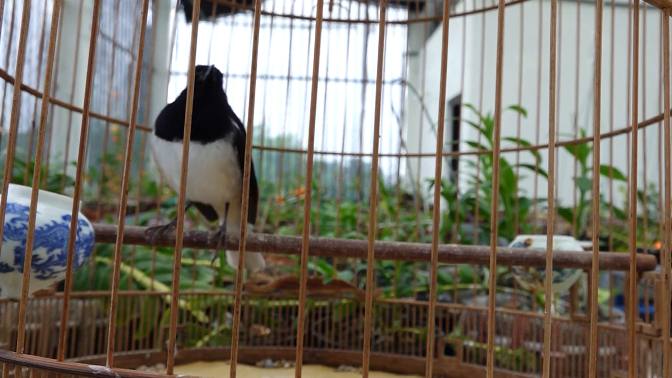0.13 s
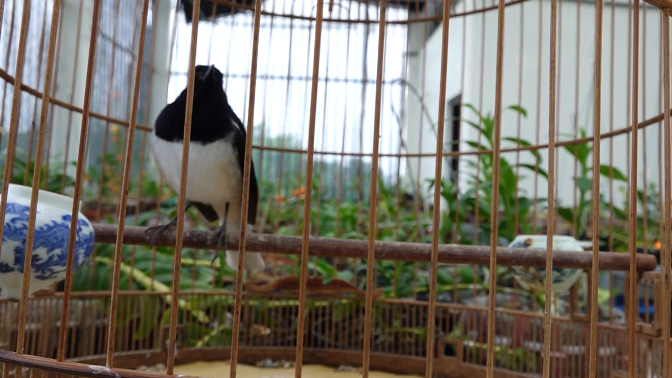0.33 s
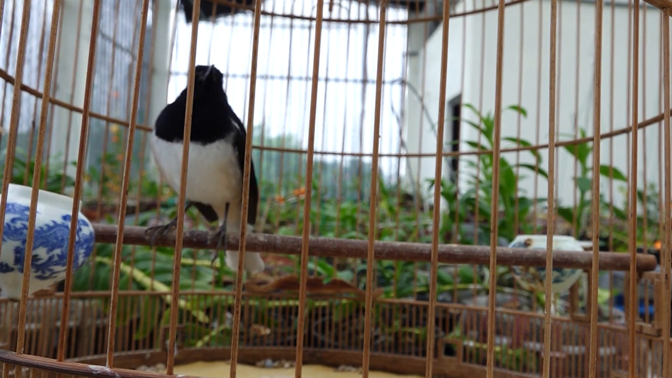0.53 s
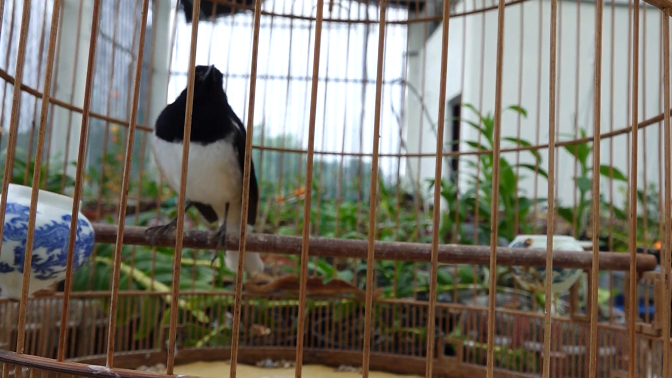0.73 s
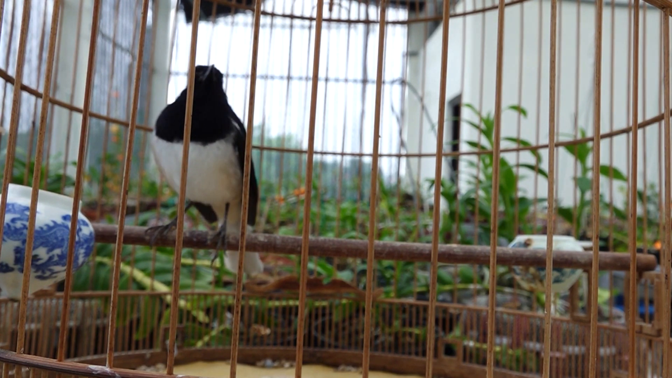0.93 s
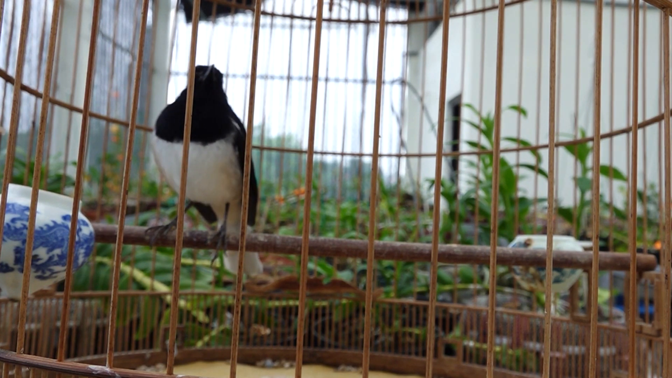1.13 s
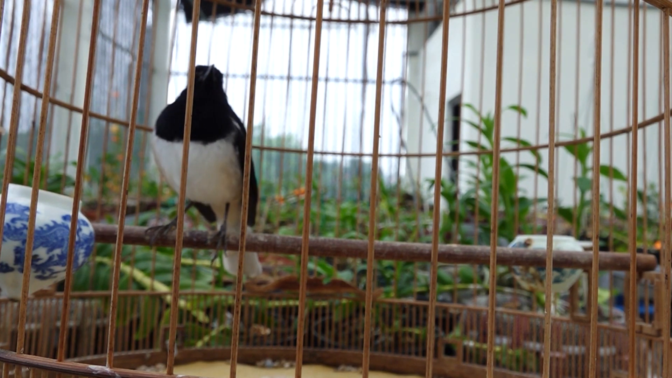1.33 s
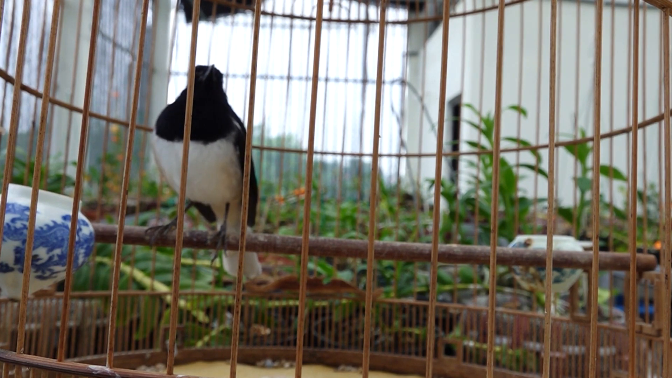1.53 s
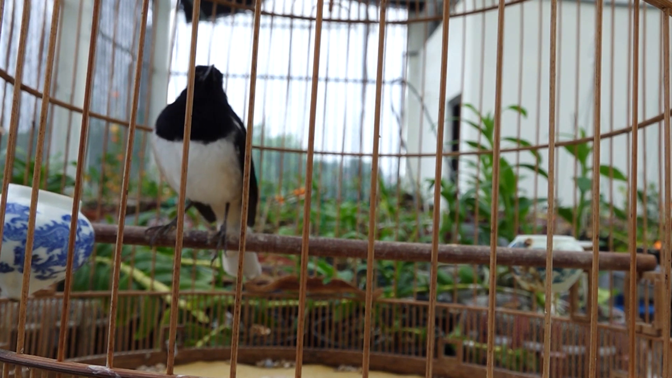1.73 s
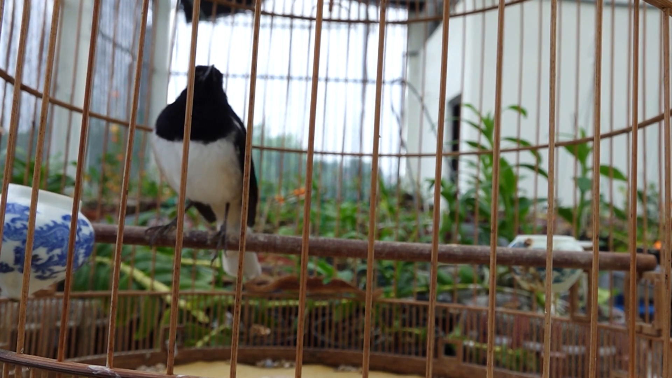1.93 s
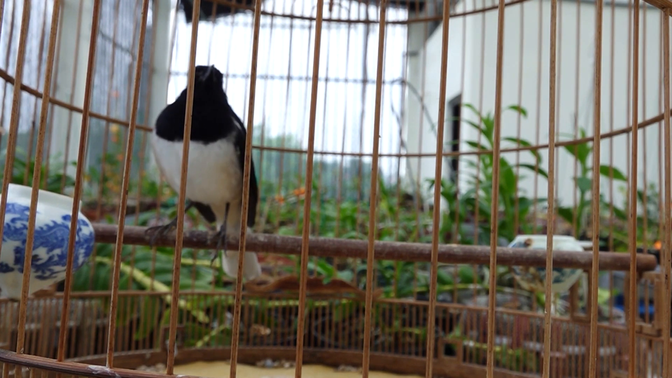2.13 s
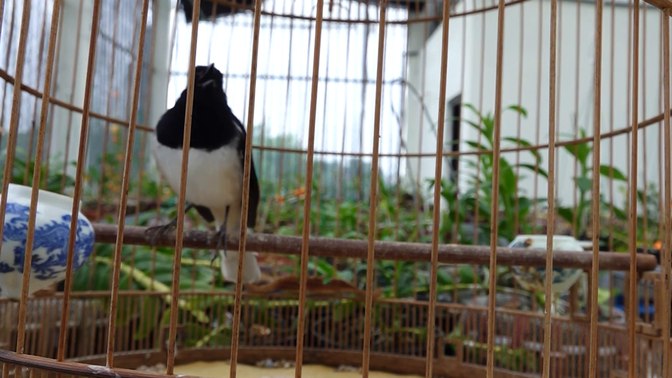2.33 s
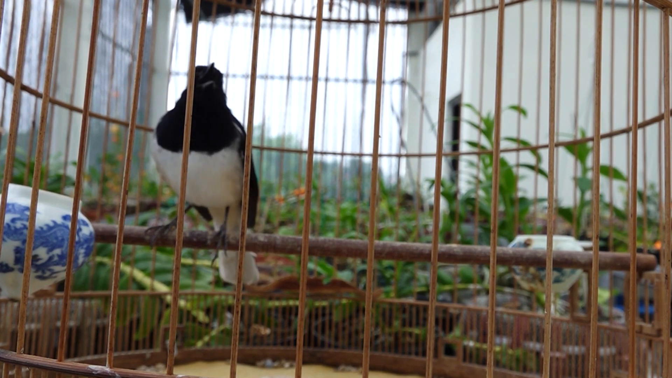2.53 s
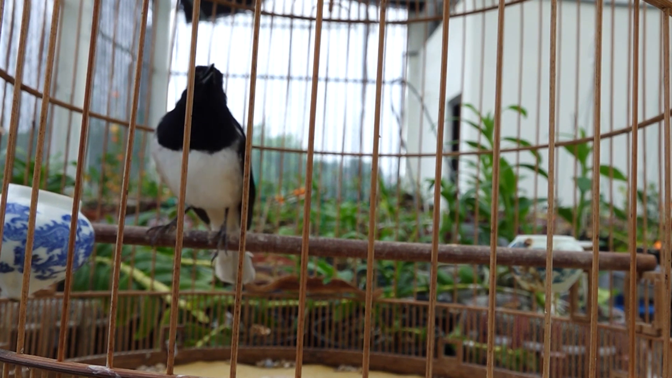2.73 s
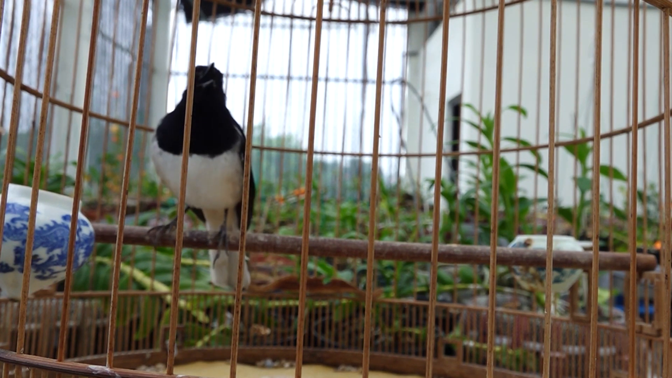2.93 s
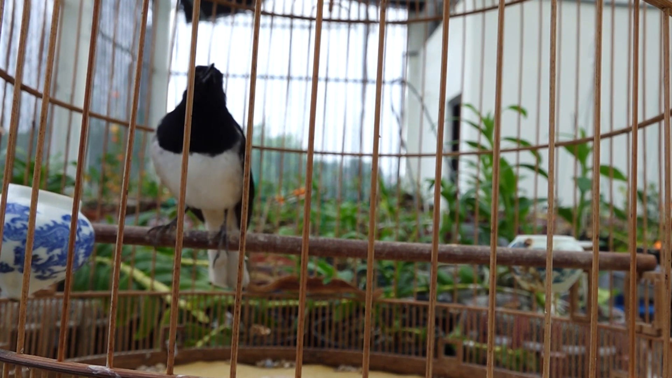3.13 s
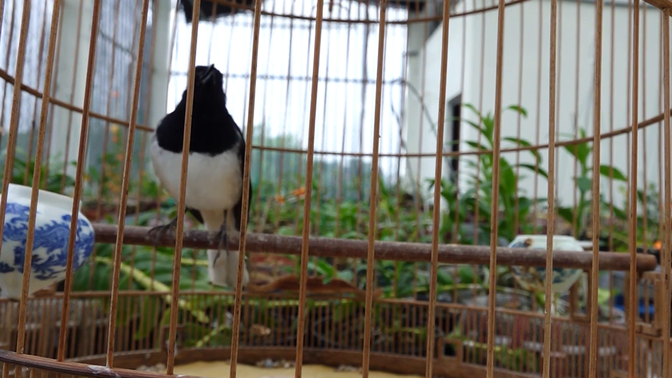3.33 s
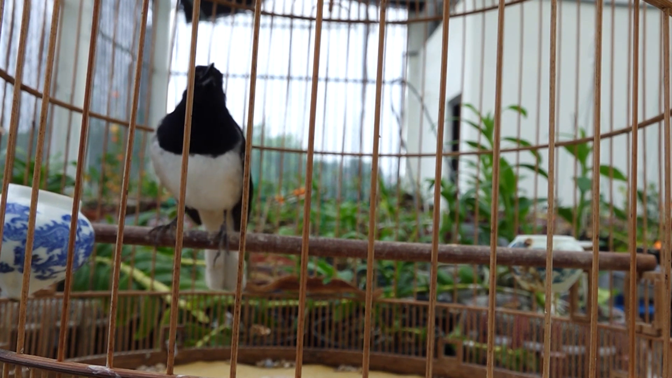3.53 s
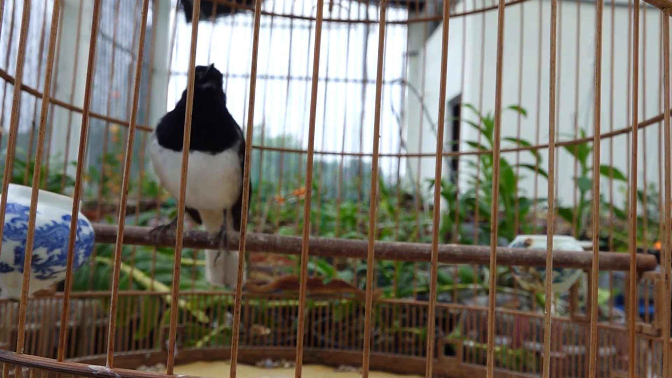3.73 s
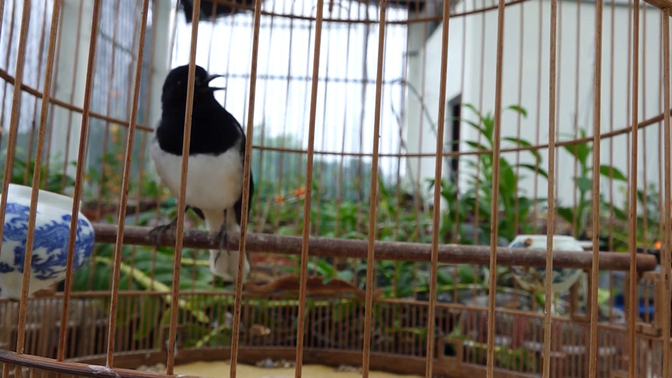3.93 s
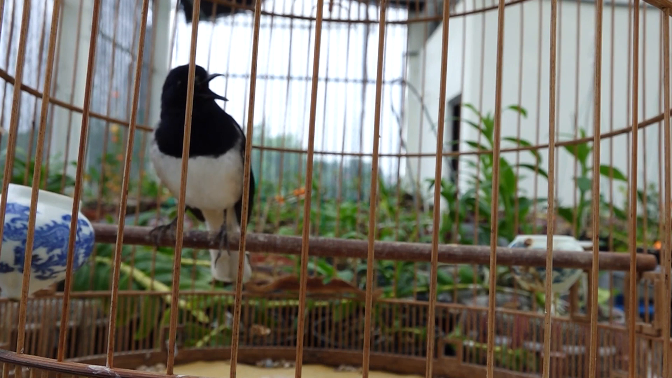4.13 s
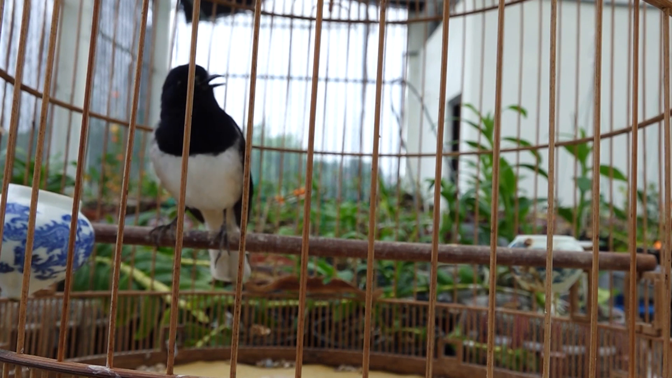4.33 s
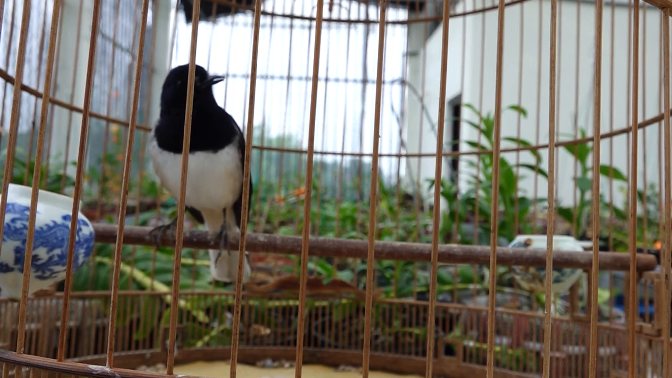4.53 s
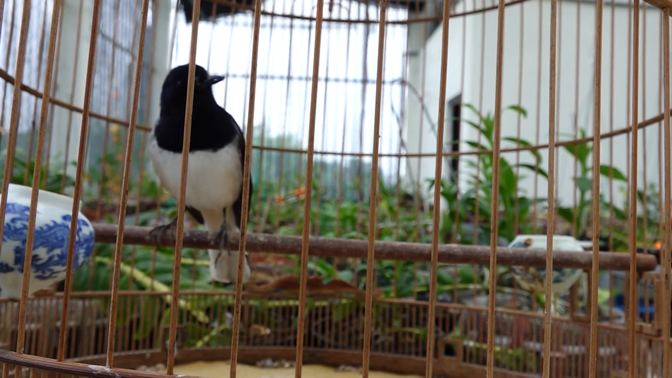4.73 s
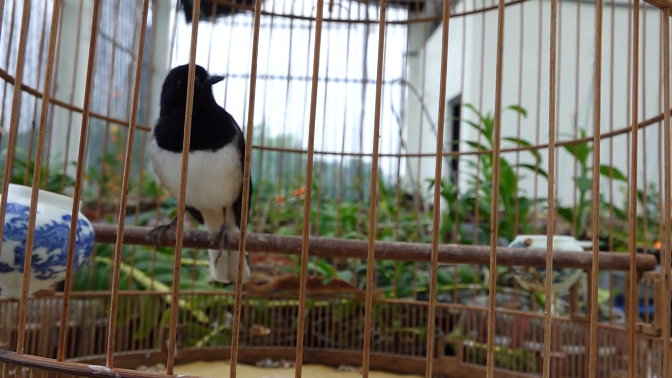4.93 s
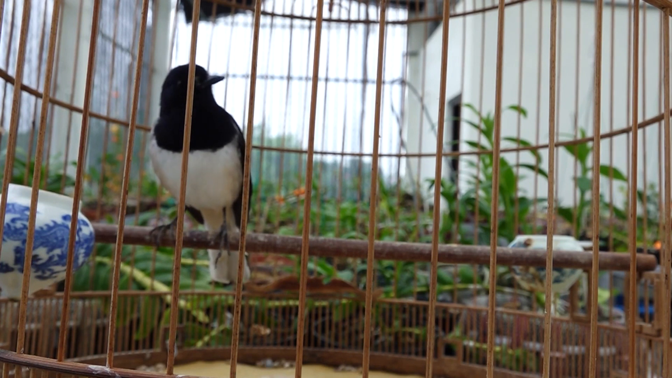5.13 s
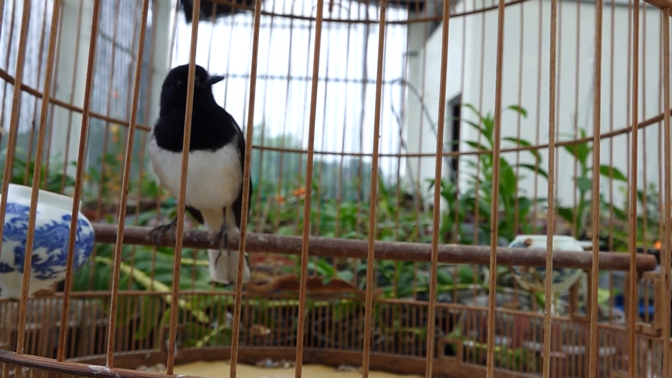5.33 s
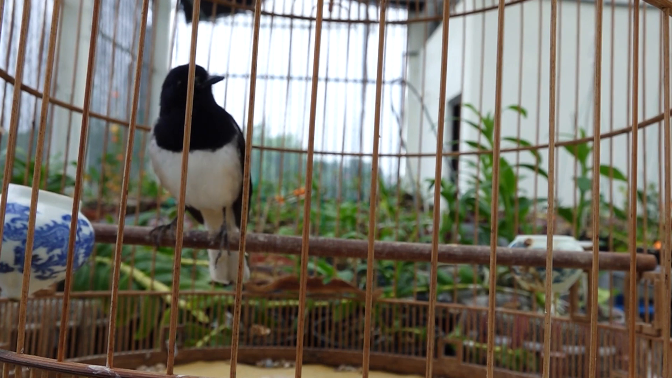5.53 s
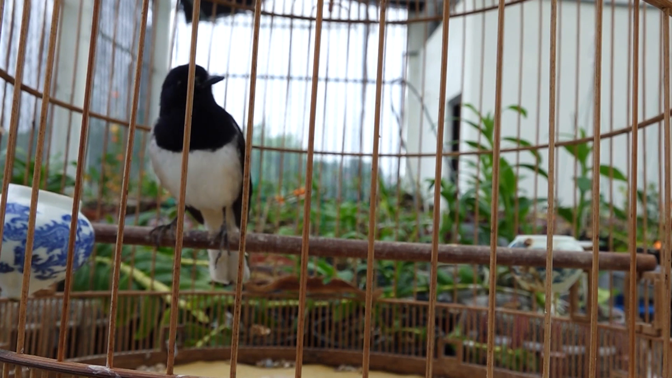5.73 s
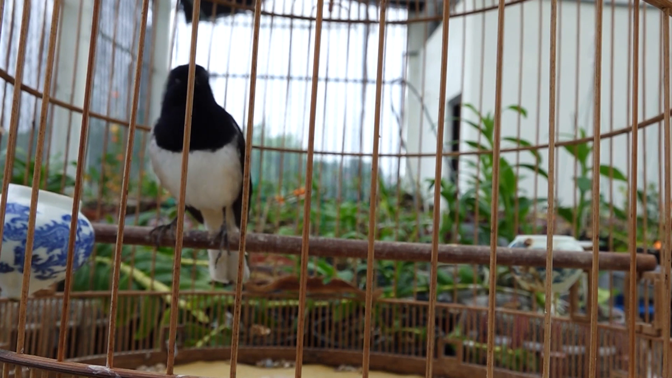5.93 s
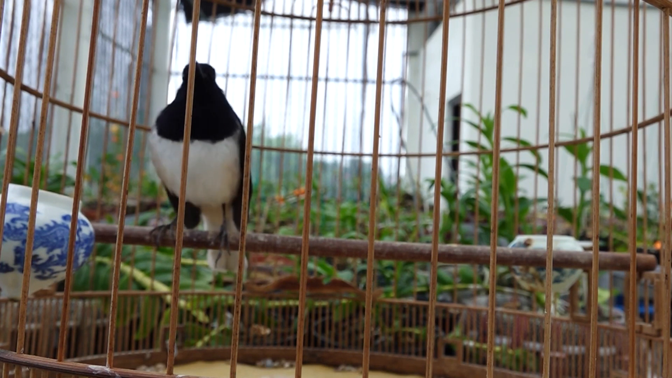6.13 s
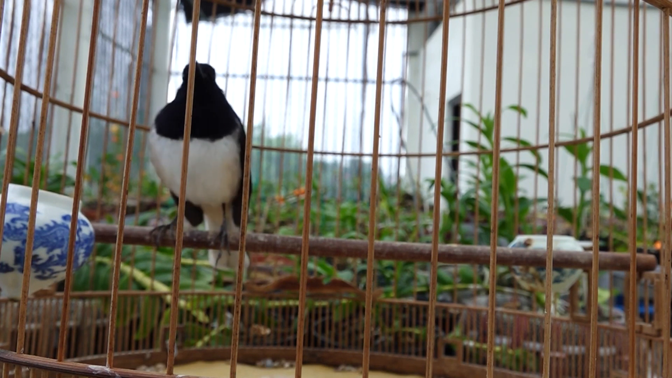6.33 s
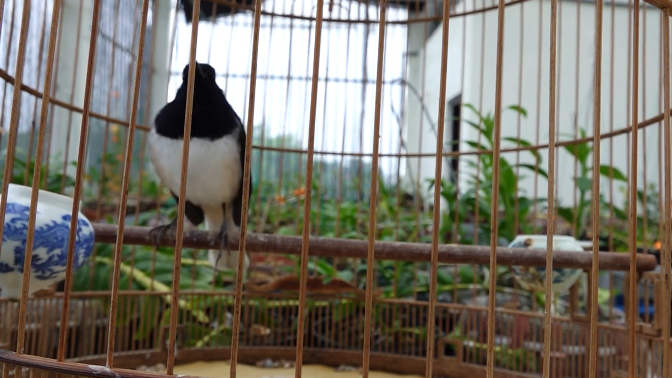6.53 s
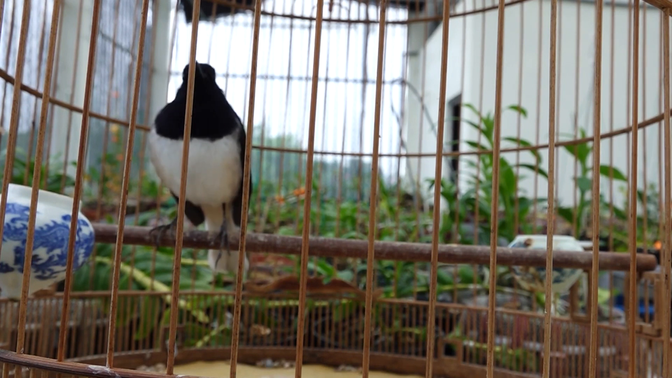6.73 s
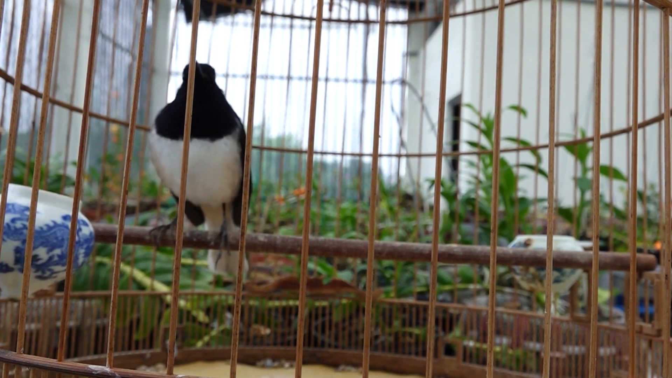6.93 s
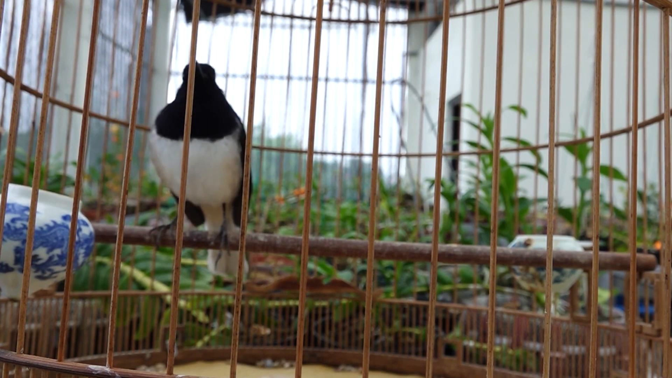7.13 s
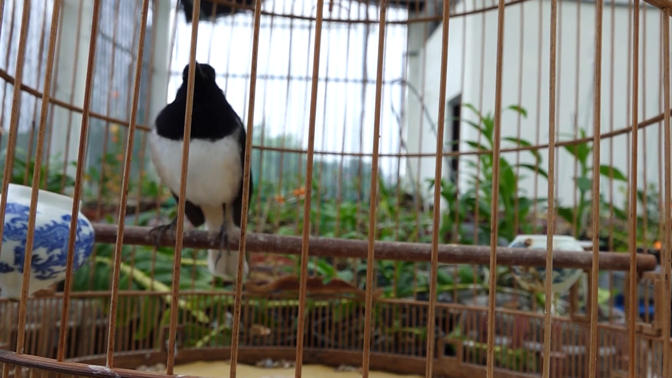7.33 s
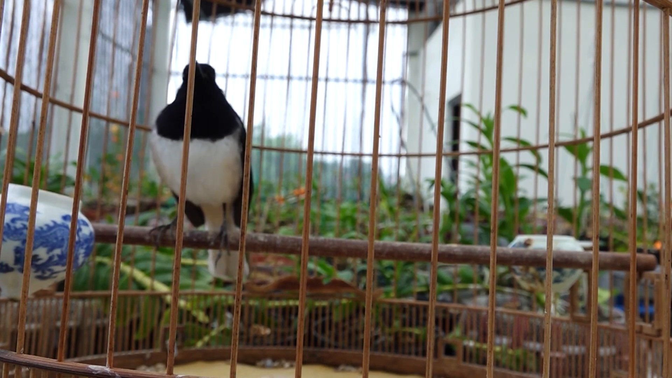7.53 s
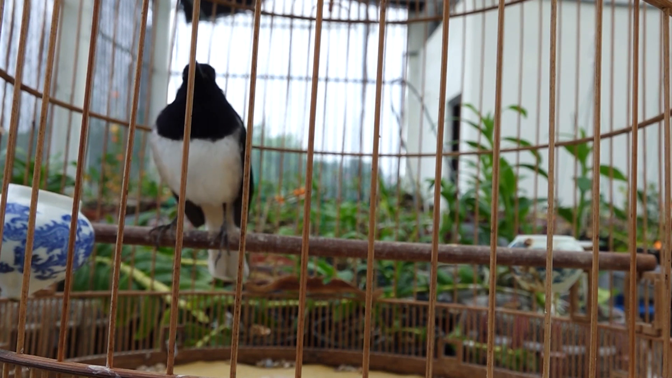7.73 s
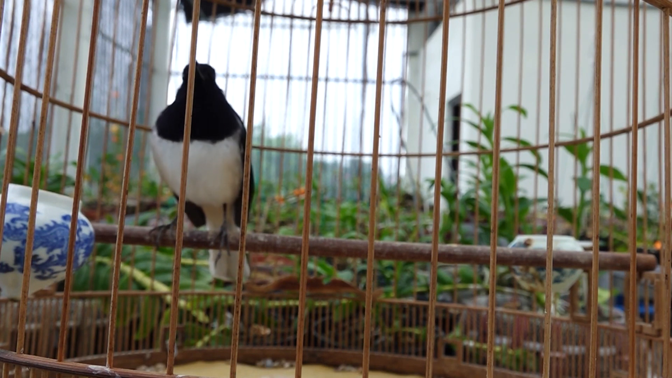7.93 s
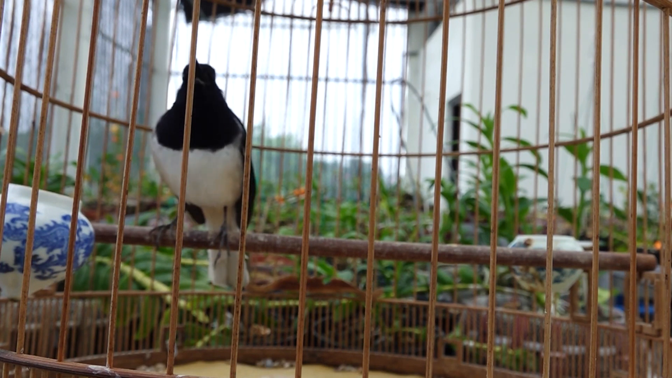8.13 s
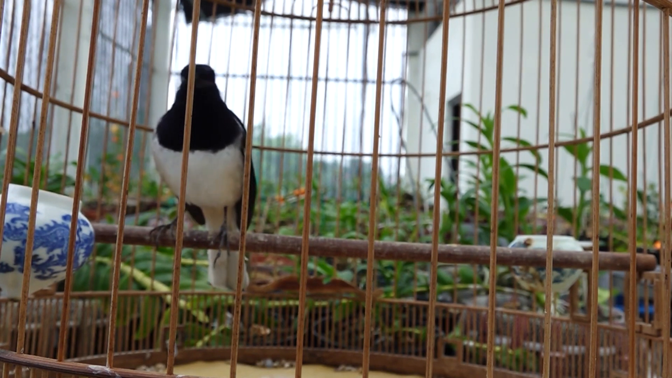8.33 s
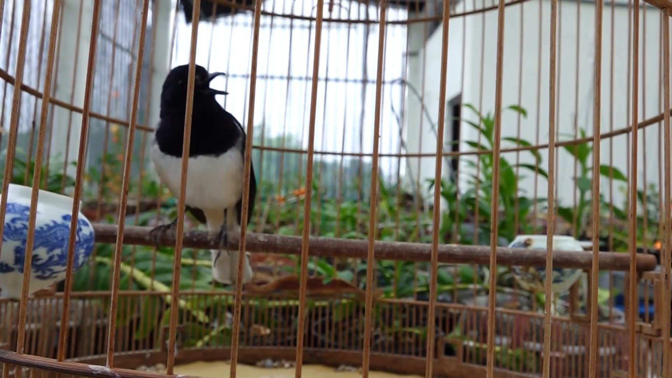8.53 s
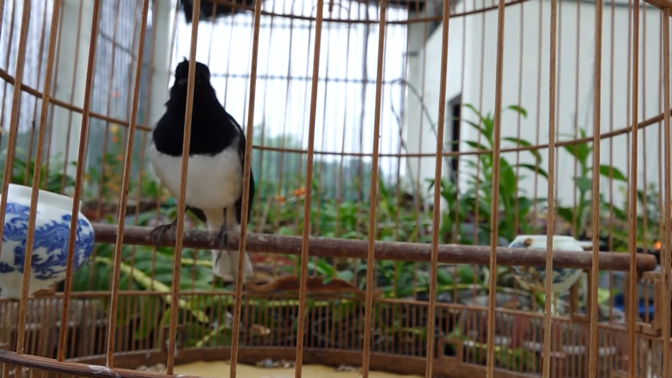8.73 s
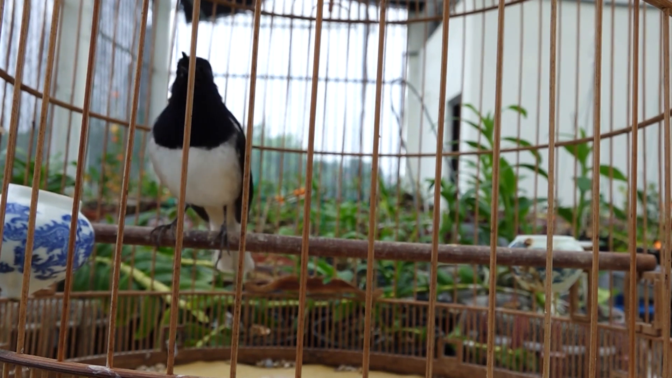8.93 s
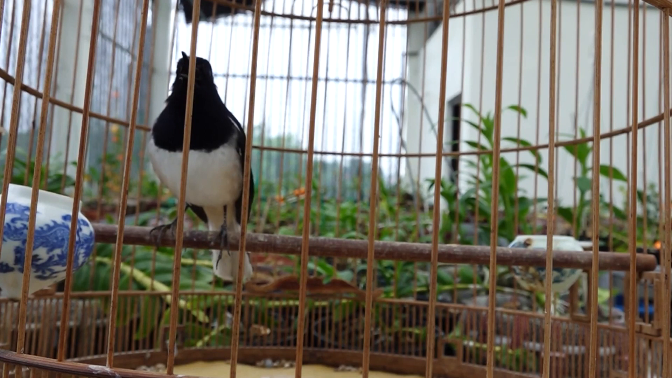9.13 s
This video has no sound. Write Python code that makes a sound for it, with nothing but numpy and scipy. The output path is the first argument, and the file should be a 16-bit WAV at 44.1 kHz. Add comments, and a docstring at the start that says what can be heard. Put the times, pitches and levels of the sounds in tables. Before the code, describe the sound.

A caged magpie-robin sings two loud, ringing phrases of piercing whistles and raspy chatter on a hard-walled veranda, with distant birds over soft outdoor wash.

```python
"""Other birds call at a distance over a soft outdoor wash, most of their sound arriving by reflection.
From 2.4 s a caged magpie-robin, close by on a hard-walled veranda, sings a phrase and the wash sinks.
The two sides of its syrinx whistle alone or together, and together they make sum tones; the walls ring.
Fainter distant calls follow as the wash rises a little; from 8.1 s comes a second phrase, to the end."""
import sys
import numpy as np
from scipy import signal
from scipy.fft import rfft, irfft
from scipy.io import wavfile
from scipy.ndimage import uniform_filter1d, minimum_filter1d

SR = 44100
rng = np.random.default_rng(int(sys.argv[2]) if len(sys.argv) > 2 else 0)


def unload_audio(sound):
    """Save the sound as a 16-bit wav file, at the path given as the first command line argument."""
    columns = np.transpose(np.atleast_2d(sound))
    # keep every value between -1 and 1, then stretch to whole-number steps
    steps = np.round(np.clip(columns, -1, 1) * 32767)
    wavfile.write(sys.argv[1], SR, steps.astype(np.int16))


N = 404838
TIME = np.arange(N) / SR

# All table levels are relative.
# Whistles of the upper voice, one glide each: start t/s, length t/s, from f/Hz, to f/Hz,
# steepest after t/s, glide t/s, level/dB, swell level/dB, attack t/s, release t/s,
# overtone level/dB, harshness (0-1)
UPPER_WHISTLES = [ (2.378, 0.18, 4060, 4702, 0.016, 0.068, -13, -3.5, 0.039, 0.0045, -3, .02),
                  (3.326, 0.064, 5090, 3350, 0.024, 0.031, -25, 10.5, 0.026, 0.0044, -1.5, 0.28),
                  (3.645, 0.026, 3700, 3320, 0.01, 0.022, -17.5, -4.5, .004, 0.0044, -4.5, 0.44),
                  (3.842, 0.13, 5985, 5425, 0.043, .05, -10, -2.5, .05, 0.038, 5.5, 0.05),
                  (4.048, 0.28, 3690, 4642, .001, 0.038, -13.5, -3, 0.038, 0.0024, -14, 0.04),
                  (4.388, 0.028, 5700, 5660, .009, 0.0088, -27, -1, 0.0057, .006, 2.5, 0.23),
                  (8.067, .184, 4235, 4745, 0.058, 0.041, -12.5, -11, 0.057, 0.0078, -3, 0.01),
                  (8.764, 0.23, 4222, 5497, .166, 0.057, -11.5, 2.5, 0.018, 0.02, -3, 0.06)]
# Whistles of the lower voice: start t/s, length t/s, from f/Hz, to f/Hz,
# steepest after t/s, glide t/s, level/dB, swell level/dB, attack t/s, release t/s,
# overtone level/dB, harshness (0-1)
LOWER_WHISTLES = [ (2.5, 0.22, 3903, 3782, .108, 0.047, -13.5, 4, 0.017, 0.012, -3, .025),
                  (2.939, .153, 3310, 3869, .001, .036, -13, -2.5, 0.0087, 0.0055, -2, 0.22),
                  (3.232, 0.051, 2553, 2400, 0.036, 0.011, -22, 2, 0.0095, 0.0055, -17, 0.49),
                  (3.329, 0.062, 4640, 2620, 0.015, 0.029, -18.5, -13, .023, 0.034, -2, .08),
                  (3.549, 0.051, 2725, 2626, 0.02, 0.0056, -22.5, -8, 0.0066, 0.0087, -6.5, .35),
                  (3.621, 0.064, 5172, 2861, 0.016, 0.013, -17.5, -16.5, .02, .008, -1.5, .35),
                  (4.346, 0.064, 3540, 4060, 0.021, .1, -29.5, -7.5, 0.011, .004, 11, 0.54),
                  (8.175, 0.286, 3988, 3690, 0.1, 0.079, -14, 0.5, 0.05, 0.013, -2, .06),
                  (8.572, 0.11, 2918, 3398, 0.05, 0.028, -19.5, 6, 0.087, 0.03, 12, 0.18),
                  (9.153, .045, 3600, 3420, 0.00078, 0.0089, -13.5, 6, 0.0063, .005, 7, 0.45)]
# Warbles of the lower voice: start t/s, length t/s, lead-in t/s, scoop t/s, from f/Hz, top f/Hz,
# first dip t/s, first dip f/Hz, each dip's size over the last (ratio), closing drop f/Hz,
# level/dB, overtone level/dB, harshness (0-1)
LOWER_WARBLES = [ (2.865, .08, 0.016, 0.021, 2500, 3784, 0.028, 1534, 0.57, -0.5, -11.5, -1.5, .45),
                 (3.17, .062, 0.02, 0.015, 2520, 3623, .015, 597, .9, 701.5, -14, 1, 0.7),
                 (3.468, .082, 0.021, .007, 2380, 3992, 0.01, 353, 1, 999, -12, 1.5, 0.7),
                 (9.079, .079, .015, .02, 2520, 3837, 0.0227, 1248, 0.597, 9, -14.5, 6.5, 0.61)]
# Trains of pips into which the upper voice breaks: start t/s, pips (count), first period t/s,
# each period over the last (ratio), first f/Hz, last f/Hz, first level/dB, last level/dB,
# sounding share of first period (0-1), of last (0-1)
UPPER_PIP_TRAINS = [ (2.546, 7, .0236, .994, 4710, 4540, -14.5, -19.5, .85, .68),
                    (4.323, 5, .0105, 1.14, 4830, 5350, -12.5, -14, .95, .95),
                    (8.254, 6, .026, 1, 4760, 4260, -17, -30, .74, .36)]
# Transmission of throat and beak: f/Hz, level/dB
THROAT_RESPONSE = [(2000, -18.5), (2700, -12.5), (3600, 0), (5500, -1), (7000, -10.5), (8600, -6),
                   (10200, -9), (11500, -36.5), (13300, -16.5), (15300, -10)]
# Reverberation time of the veranda, apart from its early boost: f/Hz, t60 t/s
RING_TIME = [(500, 1.1), (2800, 1.69), (4500, 1.245), (6000, 0.8), (9000, 0.72), (15000, .35)]
# Single slurs of distant birds: start t/s, length t/s, start f/Hz, end f/Hz, level/dB
FAR_SLURS = [ (.032, 0.085, 4460, 2950, -44.5), (.194, 0.069, 3626, 2724, -35),
             (.25, 0.14, 3584, 2850, -34), (.388, 0.092, 3073, 2720, -30), (.56, 0.19, 4890, 4710, -60.5),
             (.667, 0.052, 5300, 5880, -58), (1.24, 0.25, 3530, 3810, -59), (.872, 0.071, 4413, 3505, -60),
             (2.2, 0.037, 4800, 5540, -52.5), (4.2, 0.062, 2882, 2806, -35), (4.799, 0.37, 535, 532.3, -81),
             (5.33, .16, 2852, 2780, -66), (5.88, .26, 2513, 2579, -71.5), (5.88, 0.058, 3510, 3950, -67),
             (5.93, .16, 3930, 4035, -63), (6.097, 0.34, 657, 561, -66.5), (6.346, 0.18, 4780, 4596, -61.5),
             (6.66, 0.043, 5464, 5320, -64), (6.7, 0.15, 3880, 2944, -61.5), (6.88, 0.042, 4800, 5480, -60),
             (7.08, 0.059, 3200, 4940, -62.5), (7.444, 0.15, 997, 1030, -64.5),
             (7.46, 0.13, 3700, 3196, -55), (7.68, 0.095, 2962, 2640, -58), (7.998, 0.054, 2640, 4040, -40)]
# Repeated chirps of distant birds: start t/s, chirps (count), period t/s, length t/s,
# start f/Hz, end f/Hz, level/dB, growth per chirp level/dB
FAR_CHIRP_SERIES = [ (1.272, 4, .297, 0.066, 4400, 4850, -58, 1.5),
                    (5.582, 4, 0.25, 0.066, 5580, 4450, -64.5, 1.5),
                    (6.548, 6, .251, .06, 4430, 4890, -55.5, 0.36)]
# Spectrum of the outdoor wash: f/Hz, level/dB per Hz
WASH_SPECTRUM = [(30, -25.5), (140, -17), (290, 0.5), (370, -4.5), (460, 0.5), (780, -2), (1050, 1),
                 (2400, -7), (3000, -7), (4600, -17.5), (7500, -39.5)]
# Spectrum of the low rumble and thin hiss: f/Hz, level/dB per Hz
HISS_SPECTRUM = [(25, -14.5), (60, -3), (115, 1), (200, -7), (2000, -20), (4500, 1.5), (6300, -0.5),
                 (7300, -12), (8700, 1.5), (9500, -8), (10500, -21.5), (15500, -19.5)]
# Course of the background level: t/s, level/dB
BACKGROUND_LEVEL = [(0, -53), (1.6, -54), (2.4, -54), (2.75, -59), (3.6, -60.5), (4.35, -66.5), (5, -64.5),
                    (6.4, -63), (8.1, -63.5), (8.3, -66.5), (9.18, -69.5)]
# Left-right correlation of the background: f/Hz, likeness (0-1)
LIKENESS = [(60, 0.88), (250, 0.99), (500, 0.71), (1000, .67), (2200, 0.68), (5300, 0.94)]

THRESHOLD = .06  # a whistle starts and stops at this share of its strength
HOOK, HOOK_S = .05, .006  # it starts sharp by this share of its pitch and settles this fast
# the lead-in of a warble creeps up softly until the voice catches
CREEP_HZ_PER_S, LEAD_IN_DB, CATCH_S = 23000, -4, .007
DROP_S = 0.017  # the closing drop of a warble takes this long
DB_PER_OCTAVE = 32  # a warble weakens as its pitch falls below the top
# the faintest birds chirp at random within these ranges
STRAY_PER_S, STRAY_DB = 1.1, -68
STRAY_S, STRAY_HZ, STRAY_OCTAVES = (.04, .1), (3400, 5400), .25
EDGE_HZ = 15850  # upper band limit


def robin(sum_db=-17, above_db=-16, below_db=-24, clash_db=-42):
    """Intermodulation: where both sides of the syrinx sound, each modulates the other into side tones."""
    upper_notes = [whistle(*row) for row in UPPER_WHISTLES]
    for row in UPPER_PIP_TRAINS:
        upper_notes += pips(*row)
    lower_notes = [whistle(*row) for row in LOWER_WHISTLES]
    lower_notes += [warble(*row) for row in LOWER_WARBLES]
    high, high_overtones, high_rasp = voice(upper_notes)
    low, low_overtones, low_rasp = voice(lower_notes)

    effort = np.hypot(abs(high), abs(low)) + 1e-9
    sums = amp(sum_db) * high * low / effort
    above = amp(above_db) * high ** 2 * low.conj()  # at 2 f_high - f_low
    below = amp(below_db) * low ** 2 * high.conj()  # at 2 f_low - f_high
    sides = (above + below) / effort ** 2

    # turbulent air, coloured by the throat, rides on harsh and on two-voiced notes
    hz = np.fft.rfftfreq(N, 1 / SR)
    high_pass = hz ** 4 / (hz ** 4 + 2200 ** 4)
    air_colour = amp(read(THROAT_RESPONSE, hz)) * high_pass
    air = evened(irfft(rfft(rng.standard_normal(N)) * air_colour, N))
    clash = amp(clash_db) * abs(high * low) / effort
    rasp = air * (high_rasp + low_rasp + clash)
    return (high + low + sums + sides).real + high_overtones + low_overtones + rasp


def voice(notes, jitter=0.0011, rough_jitter=0.058, shimmer=0.04, edge_s=0.0043, beat_hz=330, beat_depth=0.25,
          second_db=-21, third_db=-31, fourth_db=-39, rasp_db=-29, drift=0.0023, rough_drift=0.014):
    """Phase integration: one side of the syrinx, as complex fundamental, overtones and rasp strength."""
    tone, overtones, rasp = np.zeros(N, complex), np.zeros(N), np.zeros(N)
    waver, flutter = wander(580), 1 + shimmer * wander(200)
    sway = wander(35)  # held pitches are never quite steady
    # in harsh notes a fainter tone a little higher adds a rapid beating,
    # like a close reflection against a gliding pitch
    offset_hz = beat_hz * (1 + 0.26 * wander(30))
    beat = beat_depth * np.exp(2j * np.pi * np.cumsum(offset_hz) / SR)
    for start, pitch, level, bright_db, harshness in notes:
        at = np.arange(N)[round(start * SR):][:len(pitch)]
        t, hz, push_db = TIME[at], pitch[:len(at)], level[:len(at)]
        from_edge_s = np.minimum(t - t[0], t[-1] - t)
        gate = np.sin(np.pi / 2 * np.clip(from_edge_s / edge_s, 0, 1)) ** 2
        height = np.sqrt(2) * amp(push_db) * gate * flutter[at]
        rough = harshness * (height / height.max()) ** 0.12  # a note roughens as it grows louder
        hz = hz * (1 + (drift + rough * rough_drift) * sway[at])
        jittered_hz = hz * (1 + (jitter + rough * rough_jitter) * waver[at])
        phase = 2 * np.pi * np.cumsum(jittered_hz) / SR
        swing = np.exp(1j * phase) * (1 + rough * beat[at]) / np.hypot(1, rough * beat_depth)
        tone[at] += height * swing
        rasp[at] += amp(rasp_db) * rough * height
        # low notes lie under the throat's pass band, so their overtones stand out more
        for k, db in enumerate([second_db, third_db, fourth_db], start=2):
            throat_db = read(THROAT_RESPONSE, k * hz) - read(THROAT_RESPONSE, hz)
            passed = amp(bright_db + db + throat_db) * (k * hz < SR / 2)
            overtones[at] += height * passed * (swing ** k).imag
    return tone, overtones, rasp


def whistle(start, length, from_hz, to_hz, turn_s, glide_s, db, swell_db, attack_s, release_s,
            bright_db, harshness):
    """Frequency glide: a small hook, then one S-curve, under an attack, a sloping hold and a release."""
    t = np.arange(0, length, 1 / SR)
    ease = np.tanh((t - turn_s) / glide_s)
    travelled = (ease - ease[0]) / (ease[-1] - ease[0])
    hz = (from_hz + (to_hz - from_hz) * travelled) * (1 + HOOK * np.exp(-t / HOOK_S))
    opening = np.clip(np.minimum(t / attack_s, (length - t) / release_s), 0, 1)
    opening_db = 20 * np.log10(THRESHOLD + (1 - THRESHOLD) * opening)
    level = db + swell_db * (t / length - .5) + opening_db
    return start, hz, level, bright_db, harshness


def warble(start, length, lead_s, scoop_s, from_hz, top_hz, dip_s, dip_hz, shrink, drop_hz, db,
           bright_db, harshness, count=6):
    """Frequency modulation: creeps in, scoops up, then dips again and again; loudness follows pitch."""
    t = np.arange(0, length, 1 / SR)
    low = from_hz + CREEP_HZ_PER_S * np.minimum(t, lead_s)
    hz = low + (top_hz - low) * np.sin(np.pi / 2 * np.clip((t - lead_s) / scoop_s, 0, 1))
    begin = lead_s + scoop_s
    for size in shrink ** np.arange(count):  # depth and duration shrink together
        progress = np.clip((t - begin) / (size * dip_s), 0, 1)
        hz -= size * dip_hz * np.sin(np.pi * progress) ** 2
        begin += size * dip_s
    hz -= drop_hz * np.clip(1 - (length - t) / DROP_S, 0, 1) ** 2
    soft_db = LEAD_IN_DB * np.clip(1 - (t - lead_s) / CATCH_S, 0, 1)
    level = db + soft_db + DB_PER_OCTAVE * np.log2(hz / top_hz)
    return start, hz, level, bright_db, harshness


def pips(start, count, period, slowing, first_hz, last_hz, first_db, last_db, first_share, last_share,
         fall=.016, harshness=0.19):
    """Interrupted tone: short falling pips whose pitch, level and sounding share move evenly."""
    notes = []
    for u in np.linspace(0, 1, round(count)):
        share = first_share + u * (last_share - first_share)
        size = int(SR * period * share)
        centre_hz = first_hz + u * (last_hz - first_hz)
        hz = centre_hz * np.linspace(1 + fall, 1 - fall, size)
        level = np.full(size, first_db + u * (last_db - first_db))
        notes.append((start, hz, level, 0, harshness))
        start, period = start + period, period * slowing
    return notes


def veranda(x, early_db=3, early_s=0.13, same=0.91):
    """Reverberation: sparse reflections of random sign, a strong early cluster, then a darkening tail."""
    count, step = 3000, 22  # reflections, and mean samples between them
    taps = np.zeros((2, (count + 8) * step))
    at = (np.arange(count) + 6) * step + rng.integers(0, step, (2, count))
    np.put_along_axis(taps, at, rng.choice([-1., 1.], at.shape), 1)
    hz, t, bands = signal.stft(paired(taps, same), SR, nperseg=256)
    decay = np.exp(-np.log(1000) * t / read(RING_TIME, hz)[:, None])
    decay = decay * amp(early_db * np.exp(-t / early_s))
    decay /= np.sqrt(np.mean(decay ** 2, axis=1, keepdims=True))
    tail = signal.istft(bands * decay, SR, nperseg=256)[1] / np.sqrt(count)
    return signal.fftconvolve(x[None], tail, axes=1)[:, :N]


def far_birds(waver=0.0063, glide_waver=0.18):
    """Frequency modulation: level whistles are nearly pure; wide slurs warble as they glide."""
    out, drift = np.zeros(N), wander(200)
    for s, length, start_hz, end_hz, db in far_calls():
        hz = np.geomspace(start_hz, end_hz, int(length * SR))
        depth = waver + glide_waver * abs(np.log(end_hz / start_hz))
        hz = hz * (1 + depth * drift.take(int(s * SR) + np.arange(len(hz)), mode="wrap"))
        envelope = signal.windows.tukey(len(hz), .5)
        add(out, s, amp(db) * envelope * np.sin(2 * np.pi * np.cumsum(hz) / SR))
    return out


def far_calls():
    """Superposition: single slurs, repeated chirps and strays, each t/s, length t/s, two f/Hz, level/dB."""
    repeats = []
    for s, count, period, length, start_hz, end_hz, db, growth_db in FAR_CHIRP_SERIES:
        for k in range(round(count)):
            repeats.append((s + k * period, length, start_hz, end_hz, db + k * growth_db))
    strays = []
    for when, long, high, slope in rng.random((round(STRAY_PER_S * N / SR), 4)):
        length = np.interp(long, [0, 1], STRAY_S)
        hz = np.interp(high, [0, 1], STRAY_HZ)
        end_hz = hz * 2 ** (STRAY_OCTAVES * (2 * slope - 1))
        strays.append((when * N / SR, length, hz, end_hz, STRAY_DB))
    return FAR_SLURS + repeats + strays


def outdoors(wash_db=1, hiss_db=-9, hiss_follow=0.3, flicker_db=1.18):
    """Filtered noise: a flickering wash over rumble and hiss, which follow its slow level changes less."""
    level = np.interp(TIME, *np.transpose(BACKGROUND_LEVEL))
    wash, hiss = stereo_noise(WASH_SPECTRUM), stereo_noise(HISS_SPECTRUM)
    hiss_level = level.max() + hiss_follow * (level - level.max())
    wash_level = wash_db + level + flicker_db * wander(11)
    return wash * amp(wash_level) + hiss * amp(hiss_db + hiss_level)


def stereo_noise(spectrum):
    """Spectral shaping: partly correlated noise of the given spectrum, at rms 1."""
    hz = np.fft.rfftfreq(N, 1 / SR)
    white = rfft(rng.standard_normal((2, N)))
    return evened(irfft(paired(white, read(LIKENESS, hz)) * amp(read(spectrum, hz)), N))


def paired(two, same):
    """Partial correlation: makes two unrelated signals partly alike, as at two close microphones."""
    same = np.clip(same, -1, 1)
    return np.array([two[0], same * two[0] + np.sqrt(1 - same ** 2) * two[1]])


def wander(rate_hz):
    """Low-passed noise: smooth chance of rms 1, up to about the given rate."""
    hz = np.fft.rfftfreq(N, 1 / SR)
    return evened(irfft(rfft(rng.standard_normal(N)) * np.exp(-(hz / rate_hz) ** 2), N))


def evened(x):
    """Normalization: scales to rms 1."""
    return x / np.sqrt(np.mean(x ** 2) + 1e-20)


def amp(db):
    """Level law: decibels to amplitude gain."""
    return 10 ** (np.asarray(db) / 20)


def read(points, hz):
    """Interpolation: reads a table on a log-frequency axis."""
    f, value = np.transpose(points)
    return np.interp(np.log(hz + 1), np.log(f + 1), value)


def add(mix, s, sound):
    """Superposition: mixes a sound in at time s."""
    part = mix[max(round(s * SR), 0):][:len(sound)]
    part += sound[:len(part)]


def scene(left_db=-2, right_db=1.1, room_db=-15, far_direct_db=-14, far_room_db=5.0,
          far_left_db=-2, far_right_db=1):
    """Direct-to-reverberant ratio: the robin is near, to one side; other birds come mostly by reflection."""
    song, others = robin(), far_birds()
    near = (song + amp(room_db) * veranda(song)) * amp([[left_db], [right_db]])
    far = amp(far_direct_db) * others + amp(far_room_db) * veranda(others, early_db=4.0, early_s=.1)
    return near + far * amp([[far_left_db], [far_right_db]]) + outdoors()


def record(dry, ceiling_db=-4.5, hold_s=0.012):
    """Peak limiting: a quick limiter holds the loudest notes at one height; then the band limit."""
    span = max(int(hold_s * SR), 1)
    gain = np.minimum(1, amp(ceiling_db) / (abs(dry).max(0) + 1e-9))
    limited = dry * uniform_filter1d(minimum_filter1d(gain, span), span)
    low_pass = signal.firwin(511, EDGE_HZ, window=("kaiser", 9), fs=SR)
    return signal.oaconvolve(limited, low_pass[None], "same")


dry = scene()
out = record(dry)
unload_audio(out)
```